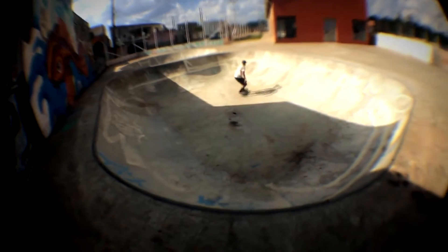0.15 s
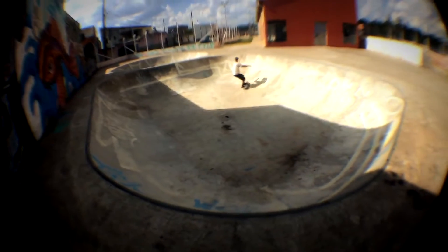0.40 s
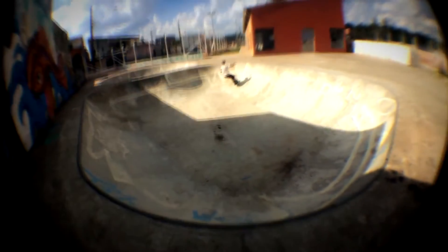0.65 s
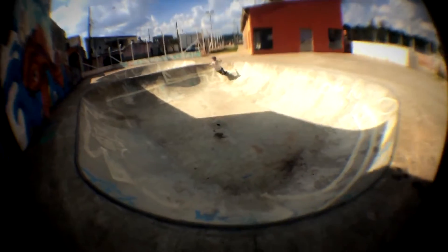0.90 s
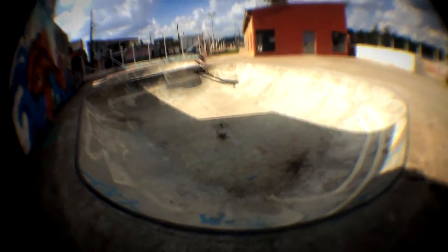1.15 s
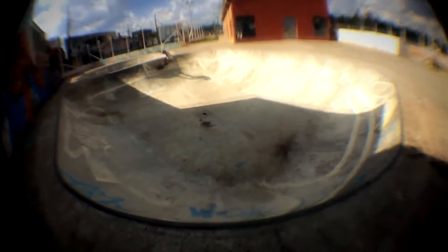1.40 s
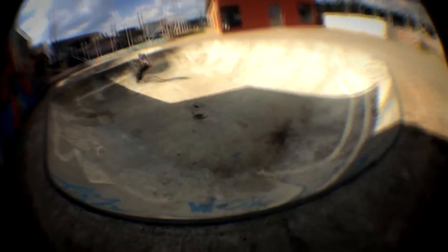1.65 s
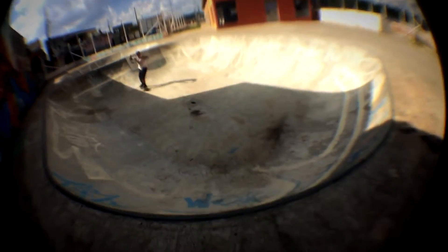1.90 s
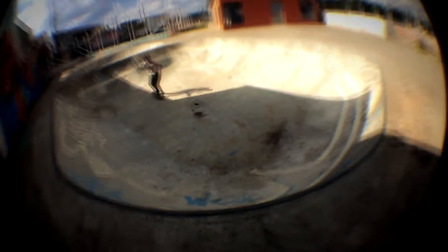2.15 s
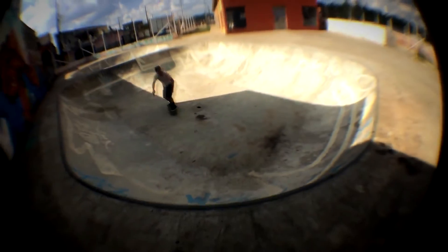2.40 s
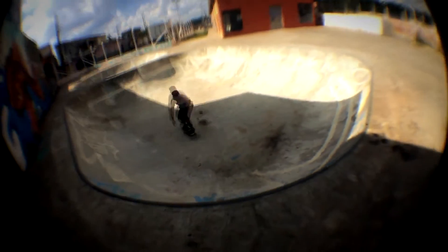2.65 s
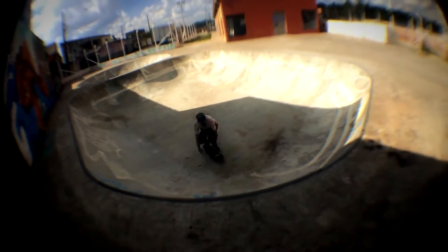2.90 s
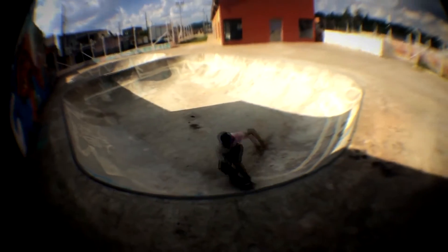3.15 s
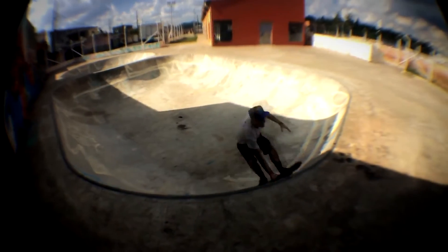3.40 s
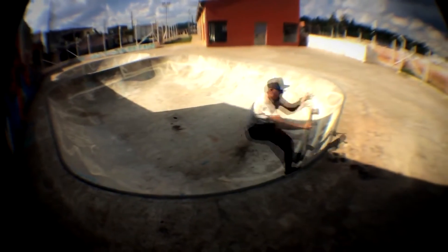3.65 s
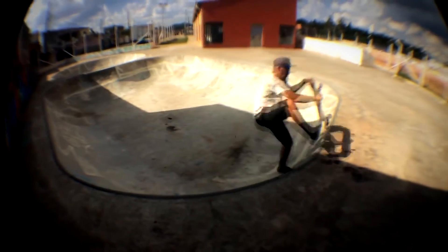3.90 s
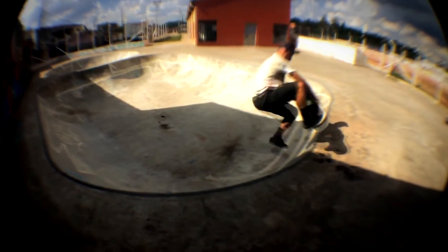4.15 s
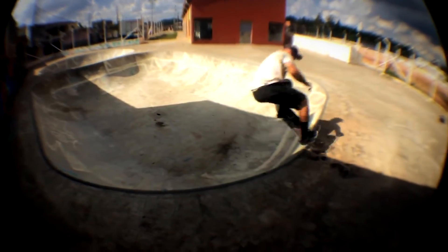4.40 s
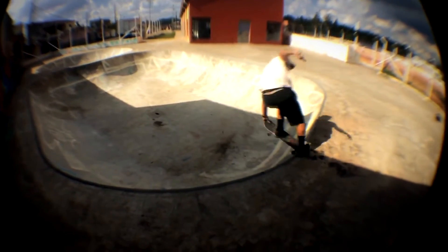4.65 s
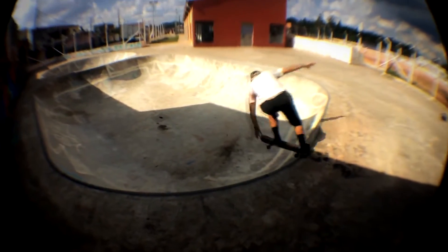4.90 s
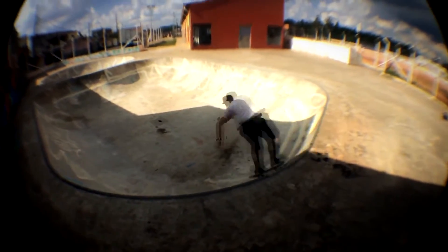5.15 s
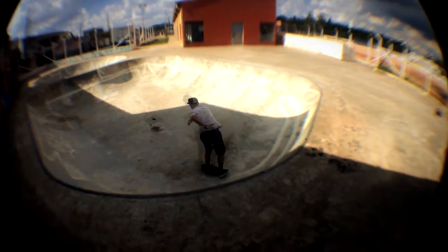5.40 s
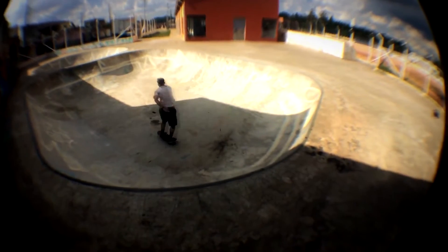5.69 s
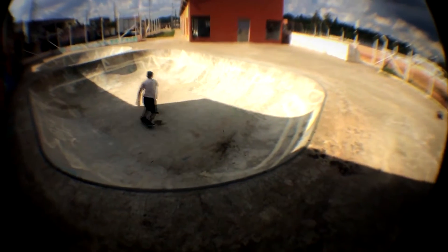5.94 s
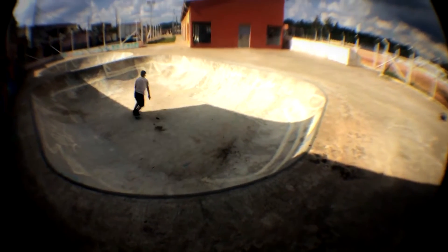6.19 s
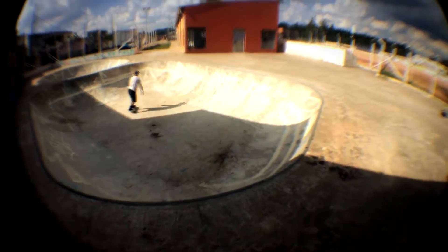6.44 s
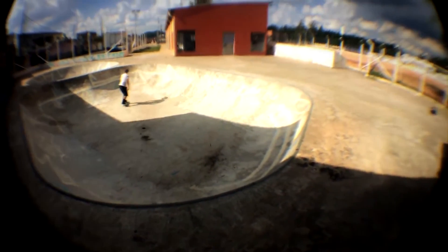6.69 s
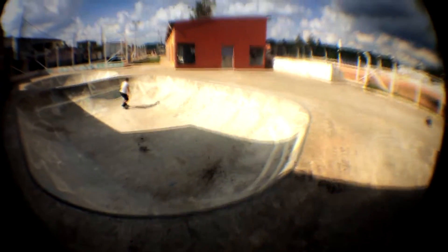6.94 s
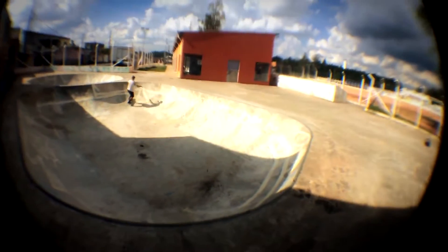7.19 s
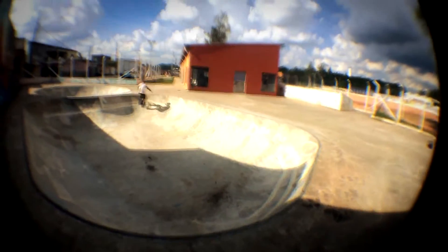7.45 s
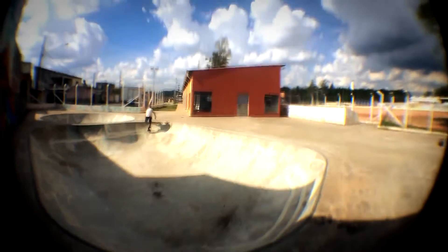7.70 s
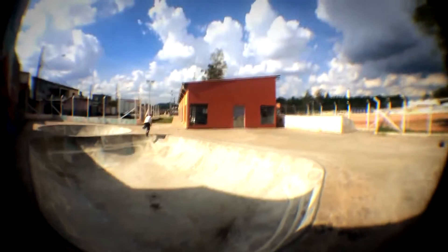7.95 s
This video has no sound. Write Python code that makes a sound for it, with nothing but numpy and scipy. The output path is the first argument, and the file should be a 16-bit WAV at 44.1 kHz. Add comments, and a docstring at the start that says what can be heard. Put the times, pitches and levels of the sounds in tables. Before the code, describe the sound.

A quiet skateboard roll with small knocks, then a second of heavy booming grind on the concrete edge, sharp landing clacks, and fading roll.

```python
"""A concrete bowl outdoors: hard skateboard wheels grind over the grit and shake the wooden deck (coloured
noise). Seams and landings knock the deck (decaying modes plus truck rattle); the bowl's walls throw knocks
back. For a good second the roll sounds as if slowed: loud, deep and dull, then it stops short. Wind and far
traffic murmur low; under the roll a deep hum climbs, sinks a little midway and climbs again."""
import sys
import numpy as np
from scipy import signal
from scipy.fft import rfft, irfft, next_fast_len
from scipy.io import wavfile
from scipy.ndimage import uniform_filter1d, map_coordinates

SR = 44100
rng = np.random.default_rng(int(sys.argv[2]) if len(sys.argv) > 2 else 0)


def to_wav(s):
    """Save 16-bit WAV."""
    ch = np.atleast_2d(s).T  # columns
    pcm = np.round(np.clip(ch, -1, 1) * 32767)  # PCM
    wavfile.write(sys.argv[1], SR, pcm.astype(np.int16))


def elevation(decibels):
    """Turn decibel levels (scalar or array-like) into linear amplitude ratios."""
    levels = np.asarray(decibels, float)
    return 10 ** (levels / 20)


N = 355887

# wheels on concrete, one list before and one after the slowed stretch: start_s, thrum_db, deck_db, grit_db
ROLL_LEVELS = [
    [(0.0, -48.5, -46.5, -49.5), (0.16, -43.5, -43, -47.5), (0.31, -42.5, -44, -51.5),
     (0.62, -46.5, -43.5, -49.5), (0.86, -51.5, -43.5, -52.5), (1.1, -45.5, -40.5, -50.5),
     (1.31, -45, -40.5, -49.5), (1.49, -58, -43, -51), (1.64, -43, -47.5, -51), (1.8, -38, -36, -45),
     (1.97, -44.5, -45, -51), (2.41, -46, -43, -47), (2.87, -51, -40, -47.5), (3.1, -40, -37.5, -45),
     (3.28, -45.5, -40, -48), (3.42, -44, -45.5, -52)],
    [(4.67, -54, -41, -45), (4.74, -50, -43, -43), (4.82, -59, -52.5, -48.5), (4.99, -62, -64, -53),
     (5.2, -49, -45.5, -60), (5.33, -46, -44, -54), (5.57, -39.5, -36, -46), (5.85, -47, -45, -51),
     (6.21, -43, -42, -50), (6.41, -48, -47.5, -52), (6.71, -45.5, -47.5, -56), (7.23, -44.5, -42, -54),
     (7.43, -48, -46, -55), (7.58, -68, -47.5, -53), (7.72, -67.5, -51.5, -62), (7.92, -52, -58, -64.5),
     (8.07, -55.5, -45.5, -67.5)],
]
# the slowed stretch, loud at first, then settling: start_s, boom_db, deck_db, grit_db
SLOWED_LEVELS = [(3.429, -20.5, -26.5, -32), (3.46, -13.5, -21.5, -25.5), (3.5, -22.5, -22, -29),
                 (3.57, -16.5, -25, -32), (3.6, -25, -18.5, -25.5), (3.634, -21.5, -26, -30.5),
                 (3.659, -17.5, -26.5, -29.5), (3.687, -28, -33, -32), (3.758, -19.5, -38, -31.5),
                 (3.789, -24.5, -36.5, -33.5), (3.88, -21.5, -35.5, -32.5), (4.0, -22.5, -38, -30.5),
                 (4.2, -23.5, -33, -32), (4.4, -26, -33.5, -33.5), (4.62, -19, -33, -35.5),
                 (4.654, -35.5, -41, -36.5)]
# colour of the grit's hiss on the roll: freq_hz, relative_db
GRIT_COLOUR = [(760, -37), (1300, -3), (1400, -2), (2370, -5.5), (2850, -11.5), (3820, -15.5),
               (6780, -32.5), (8230, -54.5), (9000, -62.5), (11700, -101)]
# colour of the grit in the slowed stretch: freq_hz, relative_db
SLOWED_GRIT_COLOUR = [(410, -27.5), (700, -1), (900, -5.5), (1020, 0), (1100, -3), (1200, -3), (1420, -5),
                      (1900, -8.5), (2310, -14.5), (2800, -22.5), (3200, -31), (3400, -58.5), (3700, -100)]
# modes of deck and trucks, nominal decay: mode_hz, relative_db, t60_s
DECK_MODES = [(123, -9, 0.096), (158.7, -4, 0.067), (228, 4.5, 0.034), (332, -2.5, 0.049),
              (434, -3.5, 0.042), (575, -2.5, 0.027), (687, -1.5, 0.039), (815, 0.5, 0.033),
              (1002, -4.5, 0.035), (1220, -2.5, 0.036), (1524, -8, 0.051), (1803, -6.5, 0.018),
              (2002, 1.5, 0.014), (2403, -18, 0.043), (2910, -0.5, 0.01), (3670, 3.5, 0.0096),
              (4740, 0.5, 0.008), (5930, 11, 0.013)]


def unit(x):
    """Scaled to rms 1."""
    return x / np.sqrt(np.mean(x ** 2) + 1e-20)


def along(points, hz):
    """(Hz, value) points read on a log axis."""
    f, v = np.transpose(points)
    return np.interp(np.log(hz + 1), np.log(f + 1), v)


def gains(rows):
    """One gain per sample for each of three dB columns; a short fade to silence outside the table."""
    t = np.arange(N) / SR
    s, *columns_db = np.transpose(rows)
    edge = np.interp(t, [s[0] - .004, s[0], s[-1], s[-1] + .009], [0, 1, 1, 0])
    fade = np.sin(np.pi / 2 * edge) ** 2
    return [fade * elevation(np.interp(t, s, db)) for db in columns_db[:3]]


def wobble(rate):
    """A smooth random curve, rate knots a second."""
    knots = rng.standard_normal(int(N * rate / SR) + 4)
    return map_coordinates(knots, [np.arange(N) * rate / SR])


def filtered(x, response):
    """x times a response of frequency."""
    m = next_fast_len(N + SR // 2)
    return irfft(rfft(x, m) * response(np.fft.rfftfreq(m, 1 / SR)), m)[..., :N]


def wavering_tone(turn, width):
    """A narrow noise band: two random curves on the sine and cosine of one phase."""
    return wobble(width) * np.sin(turn) + wobble(width) * np.cos(turn)


def ringing(hz):
    """The deck's modes as a sum of resonances of alternating sign."""
    total = 0
    for k, (mode_hz, db, t60_s) in enumerate(DECK_MODES):
        drive = 1j * hz * (1.1 / t60_s)
        resonance = drive / (mode_hz * mode_hz - hz * hz + 1j * hz * (1.8 / t60_s))
        total = total + (-1) ** k * elevation(db) * resonance
    return total


def grind(spectrum, stones, stone_db, lumpy_db, patchy_db, ring):
    """Fine grit with scattered larger stones (per s), in patches, coloured and partly rung through the deck."""
    flex = 1.08  # rise of the modes under full load
    hit = (rng.random(N) < stones / SR) * elevation(stone_db - 14.0 * rng.random(N))
    crunch = signal.lfilter([1], [1, -np.exp(-1 / (0.0086 * SR))], hit)  # a stone crunches for a few ms
    z = signal.stft(rng.standard_normal(N) * (1 + crunch), nperseg=1024)[2]
    field = uniform_filter1d(rng.standard_normal(z.shape), size=4, axis=0)
    field = uniform_filter1d(field, size=16, axis=1)
    road = signal.istft(z * elevation(patchy_db * unit(field)), nperseg=1024)[1][:N]

    def slack_and_bent(hz):
        modes = np.abs([ringing(hz), ringing(hz / flex)])
        return elevation(along(spectrum, hz)) * (1 + ring * modes)

    slack, bent = filtered(road, slack_and_bent)
    lean = np.pi / 4 * (1 + np.sin(2 * wobble(4.3)))  # the load bends the deck and shifts its ring
    coloured = np.cos(lean) ** 2 * slack + np.sin(lean) ** 2 * bent
    return unit(coloured * elevation(lumpy_db * wobble(30)))


def distance():
    """A low steady murmur of wind and far traffic: dull filtered noise."""
    # far murmur: freq_hz, relative_db
    far_colour = [(18, -35), (30, -5), (91, 7.5), (304, -23), (997, -20.5), (1200, -18), (1560, -39.5),
                  (2640, -120)]
    return elevation(-51.0) * grind(far_colour, stones=5, stone_db=-1.5, lumpy_db=2.5, patchy_db=-1.5, ring=0)


def hum():
    """A wavering low tone on a moving pitch, with weaker ones at 0.5 and 1.8 times it."""
    # low hum, level relative to the boom's noise: start_s, pitch_hz, level_db
    hum_track = [(0, 71.5, -8.5), (0.848, 76, -2.5), (1.552, 96.97, 1.5), (1.901, 104.2, -16),
                 (2.5, 116.6, 2), (3.4, 126, -4), (4.999, 108.4, -2), (6.601, 116.9, -1.5),
                 (8.07, 118.8, 3)]
    s, hz, db = np.transpose(hum_track)
    t = np.arange(N) / SR
    turn = 2 * np.pi * np.cumsum(np.interp(t, s, hz)) / SR
    tone = 0
    for ratio, gain in ((1, 1.0), (.5, elevation(-7.0)), (1.8, elevation(-5.0))):
        steady = 1.6 * np.sin(ratio * turn)
        tone = tone + gain * (steady + wavering_tone(ratio * turn, width=12))
    return elevation(np.interp(t, s, db)) * unit(tone)


def boom_gain():
    """The steady boom with its lulls and swells, silent during the slowed stretch."""
    # lulls and swells: start_s, length_s, change_db
    boom_turns = [(-.05, 0.48, 4), (0.504, 0.33, -16), (1.63, 0.29, 5), (4.755, 0.23, -23),
                  (5.197, 0.4, -6), (6.61, 0.69, 5), (7.733, 0.23, -8)]
    level_db, edge_s = -44, 0.0063
    t = np.arange(N) / SR
    turns_db = sum(db * np.clip(np.minimum(t - s, s + length_s - t) / edge_s, 0, 1)
                   for s, length_s, db in boom_turns)
    outside_slowed = (t < SLOWED_LEVELS[0][0]) | (t > ROLL_LEVELS[1][0][0])
    return elevation(level_db + turns_db) * uniform_filter1d(1. * outside_slowed, size=300)


def wheel_tones():
    """Wheel tones: narrow wavering bands whose centres drift with speed and load."""
    # one list per tone, level relative to the deck's roll: start_s, pitch_hz, level_db
    tone_tracks = [
        [(0, 1157, -14), (.9, 1097, -16), (1.8, 1328, -11), (2.2, 1110, -13), (2.8, 1250, -10),
         (5.3, 1312, -36), (6.2, 1202, -14.5), (6.8, 1256, -20), (7.3, 1135, -16), (8.07, 1136, -19)],
        [(0, 595, -8), (1.0, 745, -20.5), (1.5, 900, -5), (2.0, 742, -12), (2.8, 794.6, -5.5), (3.2, 839, -23),
         (5.3, 644, -20), (6.3, 691.4, -21), (7.1, 699.6, -17), (7.55, 774, -5.5), (8.07, 746, -16)],
        [(0, 429, -10.5), (1.4, 450.3, -5), (3.0, 446.8, -13.5), (5.25, 402, -7.5), (5.55, 452.4, -3.5),
         (5.8, 419.2, -1), (6.1, 340, -5.5), (7.0, 330, -4.5), (7.25, 439.3, -5.5), (8.07, 392, -16)],
    ]
    t, out = np.arange(N) / SR, 0
    for rows in tone_tracks:
        s, hz, db = np.transpose(rows)
        turn = 2 * np.pi * np.cumsum(np.interp(t, s, hz)) / SR
        out = out + elevation(np.interp(t, s, db)) * unit(wavering_tone(turn, width=70))
    return out


def rolling():
    """Boom of the bowl, rattle of the deck and hiss of the grit; bumps shake deck and grit together."""
    # colour of the boom: freq_hz, relative_db
    boom_colour = [(15, -50), (25, -39.5), (51, 1.5), (75, 1), (112, 5), (150, 3), (250, -5.5),
                   (320, -54.5), (550, -120)]
    # colour of the deck's rattle: freq_hz, relative_db
    body_colour = [(150, -59), (260, -12), (340, 2), (446, 3), (530, -1), (787, -4), (1060, -4.5),
                   (1230, -7), (1700, -23.5), (2210, -22), (3740, -120)]
    # colour of the rattle's low part: freq_hz, relative_db
    thrum_colour = [(90, -55), (150, -9.5), (190, 1), (260, -5.5), (330, -5), (520, -65.5)]
    boom = boom_gain()
    thrum, deck, grit = np.sum([gains(rows) for rows in ROLL_LEVELS], axis=0)
    bumps = wobble(8.1)
    low = grind(boom_colour, stones=51, stone_db=-11.0, lumpy_db=1.2, patchy_db=0.0, ring=0.056)
    low = boom * elevation(1.9 * wobble(7.4)) * unit(low + hum())
    body = grind(body_colour, stones=22, stone_db=2.0, lumpy_db=1.26, patchy_db=3.0, ring=0.89)
    mid = deck * elevation(0.14 * bumps) * body + deck * wheel_tones()
    mid = mid + thrum * grind(thrum_colour, stones=22, stone_db=2.0, lumpy_db=1.0, patchy_db=4.5, ring=0.14)
    hiss = grind(GRIT_COLOUR, stones=39, stone_db=1.0, lumpy_db=1.04, patchy_db=2.0, ring=0.43)
    return low + mid + grit * elevation(0.23 * bumps) * hiss


def slowed():
    """The slowed stretch: heavy, dull boom, deck and grit; the boom gathers round 70 Hz and a tone near 1095 Hz
    rises later."""
    # colour of the boom in the slowed stretch: freq_hz, relative_db
    slowed_boom_colour = [(12, -33), (20, 7), (70, 2), (102, -1.5), (135, -0.5), (173, -15.5), (250, -19.5),
                          (320, -39), (550, -120)]
    # colour of the deck in the slowed stretch: freq_hz, relative_db
    slowed_body_colour = [(80, -35), (120, 8), (175, -5), (257, 3), (340, -3), (484, 5), (630, 0),
                          (900, -11.5), (1170, -39.5), (1980, -120)]
    boom, deck, grit = gains(SLOWED_LEVELS)
    t = np.arange(N) / SR
    low = grind(slowed_boom_colour, stones=12, stone_db=-7.0, lumpy_db=1.3, patchy_db=-0.6, ring=0.11)
    low = filtered(low, lambda hz: 1 + 1.35 / (1 + ((hz - 70) / 9) ** 2))
    low = unit(low + .6 * np.sin(2 * np.pi * 70 * t + 1.3 * wobble(9)))
    strokes = elevation(1.2 * wobble(30) + 0.69 * wobble(90))  # the level comes in uneven strokes
    mid = grind(slowed_body_colour, stones=37.0, stone_db=0.0, lumpy_db=2.5, patchy_db=2.0, ring=0.11)
    top = grind(SLOWED_GRIT_COLOUR, stones=40, stone_db=-2.0, lumpy_db=1.5, patchy_db=1.5, ring=0.13)
    sing = unit(filtered(top, lambda hz: 1 / (1 + ((hz - 1095) / 60) ** 2)))
    sing = sing * np.interp(t, [3.75, 4.0, 4.6], [0, .42, .55])
    # a thin shelf of hiss at the top of the treble, whose upper rim flickers
    shelf_colour = [(2200, -60), (2500, -3), (3050, -3), (3300, -9), (3500, -60)]
    shelf = grind(shelf_colour, stones=40, stone_db=3, lumpy_db=1.5, patchy_db=2.5, ring=0)
    rim = unit(filtered(rng.standard_normal(N), lambda hz: np.abs(hz - 3680) < 240))
    rim = rim * np.clip(3 * wobble(7) - .8, 0, 1)
    treble = top + sing + elevation(-30.5) * shelf + elevation(-28) * rim
    return boom * low + strokes * deck * mid + strokes * grit * treble


def ticks(kind, rows):
    """Light blows at random moments, their strength scattered about the deck's level at the time."""
    rate, over_db, scatter_db, centre_hz, under_db = kind
    span_s = rows[-1, 0] - rows[0, 0]
    luck = rng.random((round(rate * span_s), 3))
    s = rows[0, 0] + luck[:, 0] * span_s
    db = np.interp(s, rows[:, 0], rows[:, 2]) + over_db + scatter_db * (2 * luck[:, 1] - 1)
    centres_hz = centre_hz * 2 ** (2 * luck[:, 2] - 1)  # within an octave either way
    return np.transpose([s, db, centres_hz, db - under_db])


def knocks():
    """Each blow rings the modes near its centre and rattles the trucks; low blows rise slowly."""
    # blows on the deck: start_s, peak_db, centre_hz, rattle_db
    deck_blows = [(0.882, -27.5, 296, -53), (0.932, -28, 358, -49), (1.3, -29.5, 810, -46),
                  (1.652, -24.5, 239, -59), (1.66, -22.5, 1010, -27), (1.676, -19.5, 300, -57),
                  (1.69, -24.5, 377, -48.5), (1.733, -22.5, 760, -35), (1.825, -22.5, 343, -42),
                  (1.874, -43, 2100, -29), (1.918, -30, 303, -52), (2.076, -29.5, 790, -54),
                  (2.317, -32.5, 324, -25.5), (2.572, -28.5, 706, -30), (2.623, -12.5, 376, -46),
                  (2.739, -20.5, 1220, -32.5), (3.488, -7, 264, -17.5), (3.544, -10.5, 280, -21.5),
                  (3.584, -10, 405, -15), (3.61, -29, 1380, -27), (3.649, -11.5, 506, -18),
                  (3.715, -11.5, 436, -26), (3.748, -7.5, 200, -28.5), (3.879, -12.5, 1290, -20.5),
                  (4.59, -19.5, 1065, -27), (4.643, -35, 678, -25), (4.673, -10.5, 2320, -7),
                  (4.709, -7.5, 2210, -21), (4.757, -37, 2348, -26), (4.796, -28.5, 1520, -28.5),
                  (5.1585, -16, 2050, -23), (5.1595, -9, 710, -21), (5.162, -17, 1250, -26.5),
                  (5.176, -21.5, 328, -23.5), (5.184, -17, 1520, -25.5), (5.213, -26.5, 600, -41),
                  (5.326, -27, 430, -48), (5.459, -27, 480, -43.5), (5.505, -22, 392, -26),
                  (5.532, -21, 527, -36.5), (5.555, -24.5, 462, -48), (5.575, -22, 443, -34.5),
                  (5.634, -29, 413, -29.5), (5.648, -21.5, 418, -45), (5.79, -30.5, 3180, -31),
                  (7.06, -23.5, 209, -42), (7.493, -31.5, 760, -55), (7.597, -32.5, 776, -43.5),
                  (7.682, -23.5, 385, -58), (7.8, -48, 900, -51), (7.819, -45, 1200, -44),
                  (8.023, -33, 397, -64), (8.034, -28.5, 453, -59), (8.053, -31, 450, -55)]
    # small seams: rate_per_s, over_deck_db, scatter_db, centre_hz, rattle_under_peak_db
    seam_ticks = (3.1, 1.8, 5.6, 410, 21)
    # dense judder in the slowed stretch: rate_per_s, over_deck_db, scatter_db, centre_hz, rattle_under_peak_db
    slowed_judder = (61, 2.5, 5, 450, 7.9)
    # rattle of the trucks: freq_hz, relative_db
    metal_colour = [(530, -45), (900, -1.5), (1890, -4.5), (2360, 4.5), (2630, -8), (3610, -8),
                    (9150, -42.5), (10900, -55), (15000, -50.5)]
    reach_oct, skirt_db = 0.46, -26  # spread of a blow over the modes; floor for the modes below it
    damping, slowest_rise_s = 0.72, 0.0036  # share of each t60; longest rise constant
    out, rattle, t = np.zeros(N + SR), np.zeros((3, N + SR)), np.arange(SR // 5) / SR
    hz, level_db, t60_s = np.transpose(DECK_MODES)[:, :, None]
    blows = np.vstack([deck_blows, ticks(seam_ticks, np.vstack(ROLL_LEVELS)),
                       ticks(slowed_judder, np.array(SLOWED_LEVELS))])
    luck = rng.standard_normal((len(blows), 2, len(DECK_MODES), 1))
    for (s, db, centre_hz, rattle_db), (scatter, turn) in zip(blows, luck):
        start = round(s * SR)
        floor_db = np.where(hz < centre_hz, skirt_db, -120)
        reach_db = np.maximum(-6 * (np.log2(hz / centre_hz) / reach_oct) ** 2, floor_db)
        modes = elevation(level_db + reach_db + 1.9 * scatter - 60 * t / (t60_s * damping))
        rise = 1 - np.exp(-(t / min(1.4 / centre_hz, slowest_rise_s)) ** 2)
        blow = rise * np.sum(modes * np.sin(2 * np.pi * hz * t + 0.51 * turn), axis=0)
        out[start:][:len(t)] += elevation(db) * blow / np.abs(blow).max()
        # rattle kinds: 0 hard and bright, 1 light, 2 dull in the slowed stretch
        in_slowed = SLOWED_LEVELS[0][0] < s < SLOWED_LEVELS[-1][0]
        kind = 2 if in_slowed else int(db < -16 and centre_hz < 3000)
        rattle_rise = 1 - np.exp(-(t / 0.0018) ** 2)
        rattle[kind, start:][:len(t)] += elevation(rattle_db - 60 * t / 0.027) * rattle_rise
    band = np.fft.rfftfreq(4096, 1 / SR)

    def rattle_colours(f):
        """The three colours, each scaled to leave white noise at its own rms."""
        return np.array([elevation(along(c, f)) / np.sqrt(np.mean(elevation(along(c, band)) ** 2))
                         for c in (metal_colour, GRIT_COLOUR, SLOWED_GRIT_COLOUR)])

    return out[:N] + filtered(rattle[:, :N] * rng.standard_normal(N), rattle_colours).sum(axis=0)


def bowl(x):
    """A few slaps from the curved walls and a short tail, all dulled."""
    # slaps of the bowl: delay_s, level_db
    wall_slaps = [(.021, -18), (0.04, -25)]
    t = np.arange(SR // 4) / SR
    answer = elevation(-51.0 - 60 * t / 0.71) * rng.standard_normal(len(t))
    for s, db in wall_slaps:
        answer[round(s * SR)] += elevation(db)
    return filtered(signal.fftconvolve(x, answer)[:N], lambda hz: 1 / (1 + 1j * hz / 2500))


def scene():
    """Roll, lip and knocks with their echoes, over the far murmur."""
    hits = knocks()
    return (rolling() + slowed() + hits + bowl(hits) + distance())[None]


def band_limit(x):
    """A steep low-pass at the top of the band."""
    return signal.sosfilt(signal.butter(12, 15900, fs=SR, output="sos"), x)


def record(dry):
    """A small camera microphone that rounds off the highest peaks."""
    rounded = dry / (1 + np.abs(dry / .7) ** 4) ** (1 / 4)
    return band_limit(rounded)


dry = scene()
out = record(dry)
to_wav(out)
```